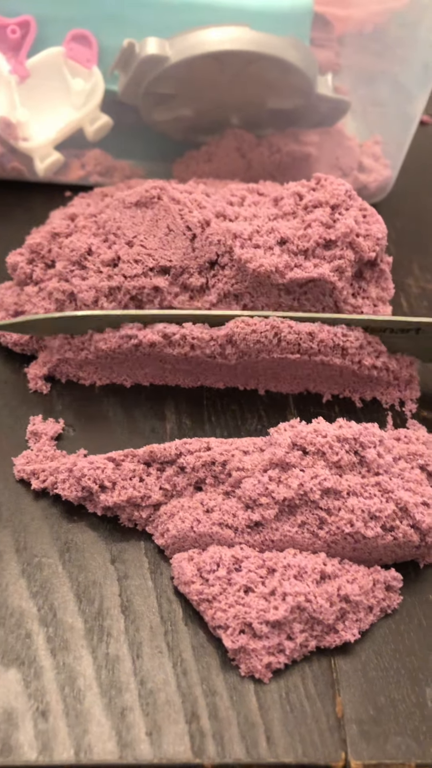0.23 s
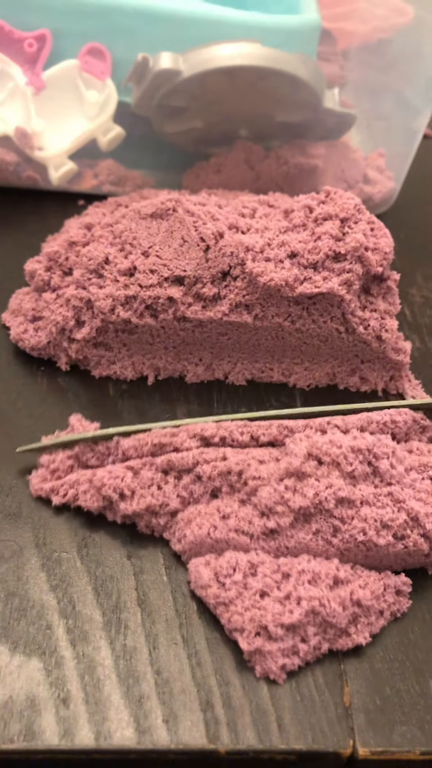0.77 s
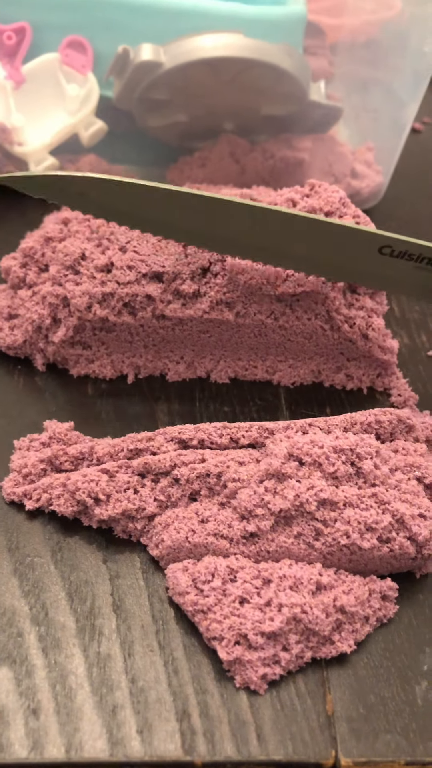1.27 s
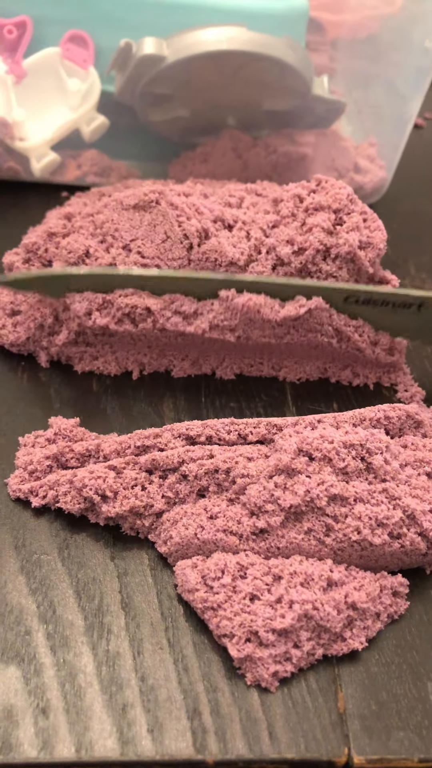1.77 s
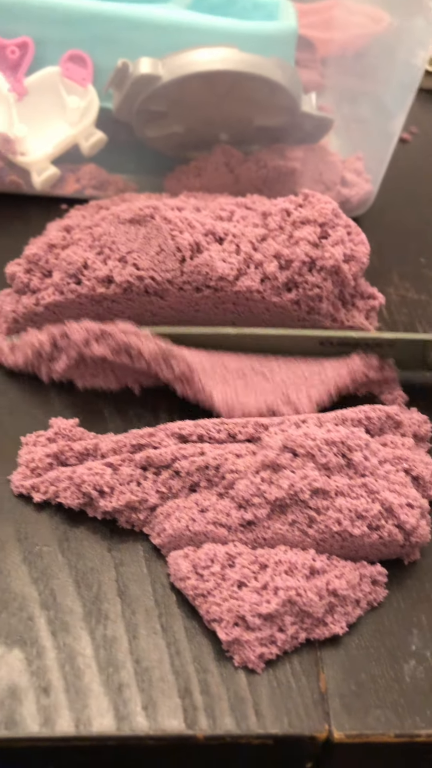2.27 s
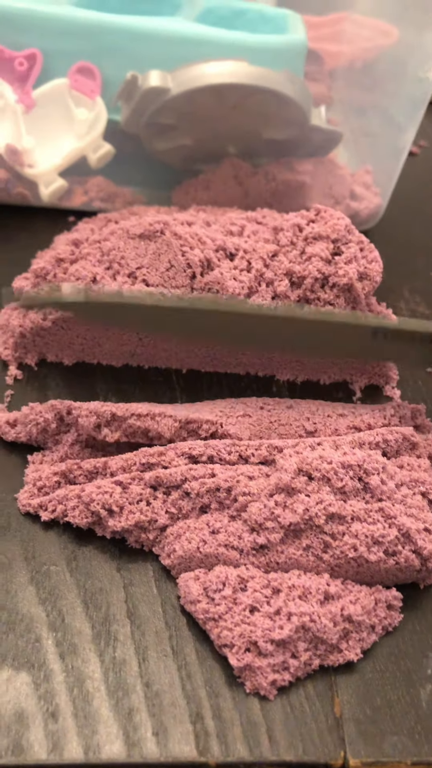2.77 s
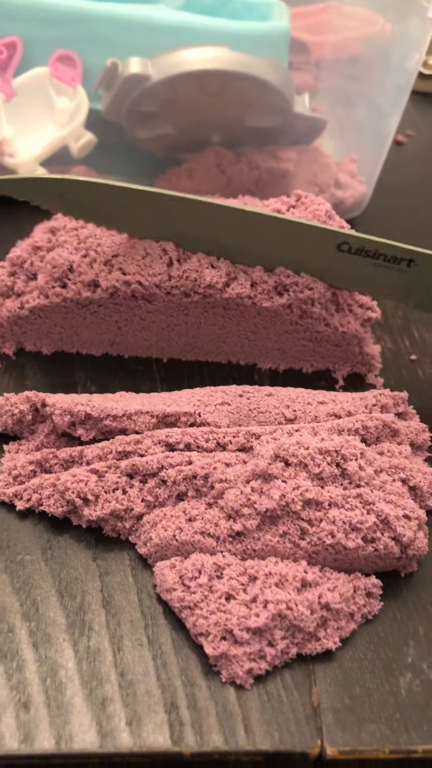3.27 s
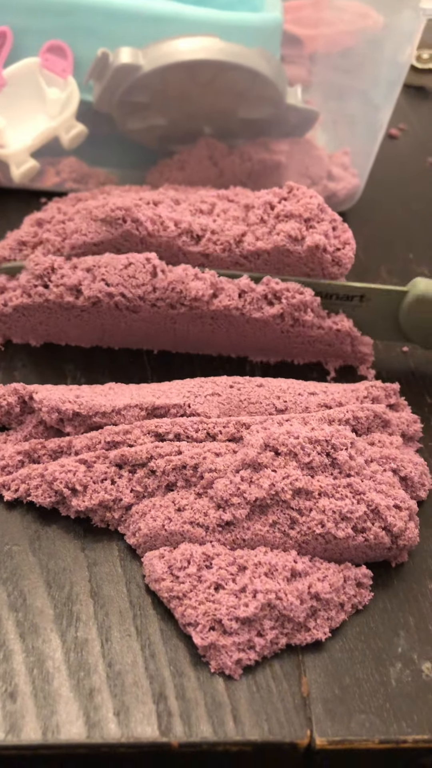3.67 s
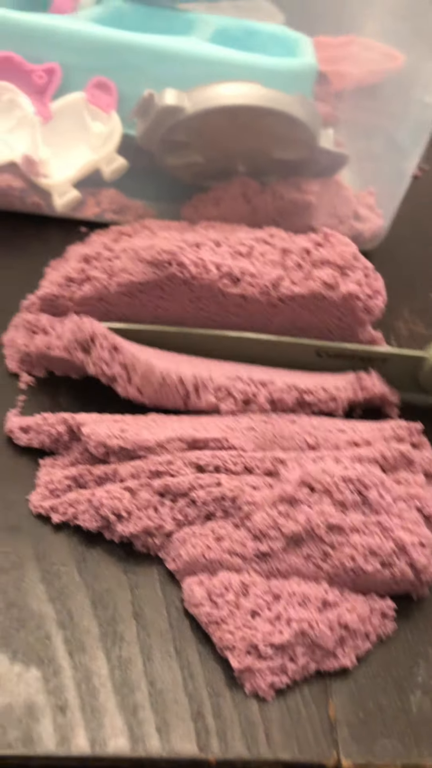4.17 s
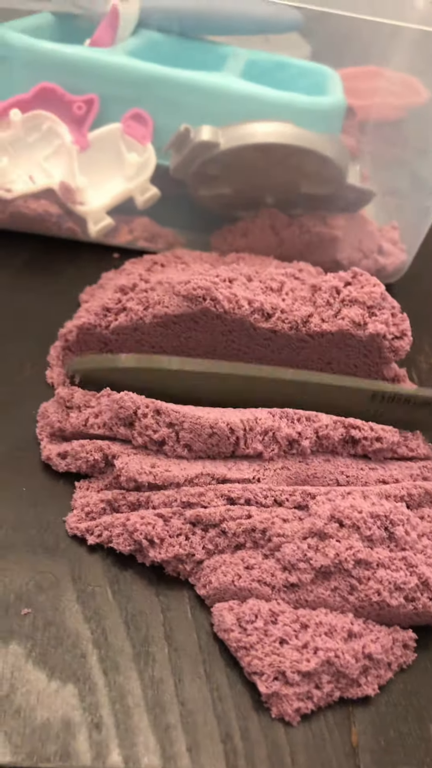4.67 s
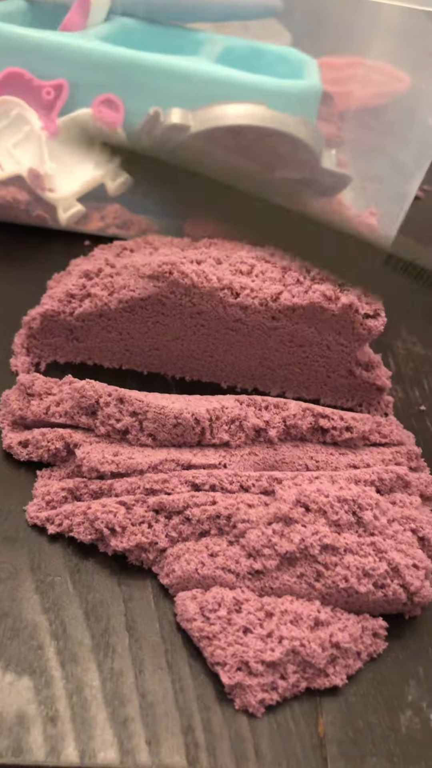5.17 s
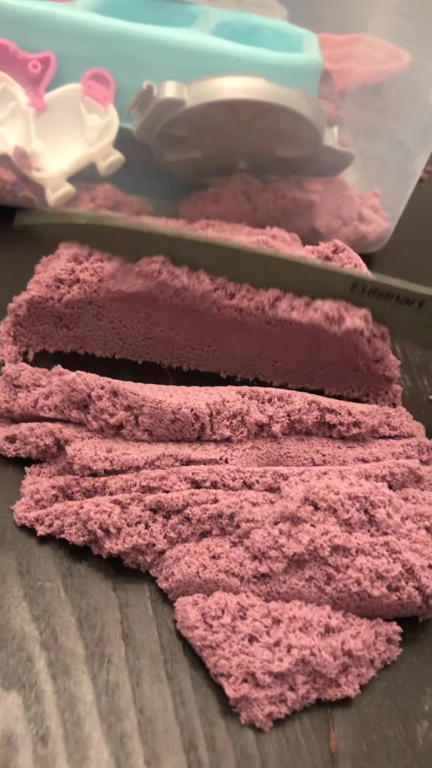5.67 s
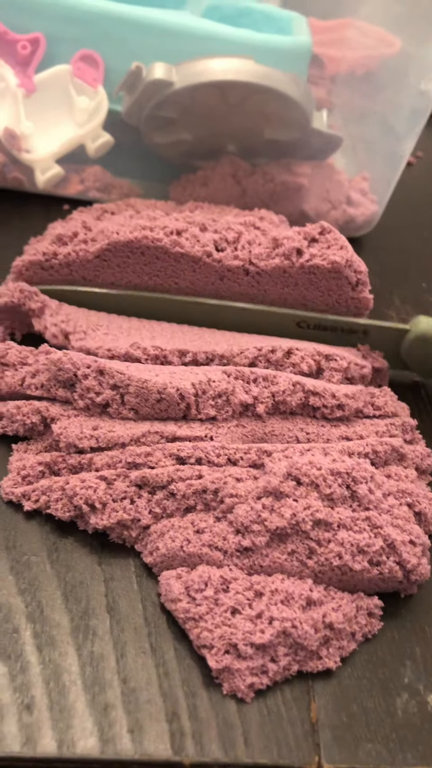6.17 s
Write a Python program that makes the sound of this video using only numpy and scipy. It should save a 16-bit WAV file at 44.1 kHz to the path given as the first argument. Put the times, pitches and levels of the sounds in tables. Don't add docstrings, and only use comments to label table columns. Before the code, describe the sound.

A knife hisses through damp gritty sand and clicks on a wooden board in four cuts, while a hollow box bumps far off.

```python
import sys
import numpy as np
from scipy import signal
from scipy.fft import rfft, irfft, next_fast_len
from scipy.io import wavfile
from scipy.ndimage import uniform_filter1d

SR = 44100
rng = np.random.default_rng(int(sys.argv[2]) if len(sys.argv) > 2 else 0)


def boost_factor(decibels):
    exponent = np.asarray(decibels, float) / 20
    return 10 ** exponent


def store_wav(level_fs):
    pcm = np.round(np.clip(np.atleast_2d(level_fs), -1, 1) * 32767)
    wavfile.write(sys.argv[1], SR, pcm.T.astype(np.int16))


N = 283122


def rms_one(x):
    return x / np.sqrt(np.mean(x ** 2) + 1e-20)


def at_hz(points, hz):
    points = np.array(points)
    return np.interp(np.log(hz + 1e-3), np.log(points[:, 0]), points[:, 1])


def smooth_noise(samples):
    noise = uniform_filter1d(rng.standard_normal(N), samples)
    return rms_one(uniform_filter1d(noise, samples))


def stroke_gain(strokes, column):
    t, gain = np.arange(N) / SR, np.zeros(N)
    for rows in map(np.array, strokes):
        gain += boost_factor(np.interp(t, rows[:, 0], rows[:, column], left=-200, right=-200))
    return uniform_filter1d(gain, size=101)


def coloured(x, spectrum):
    size = next_fast_len(len(x))
    gain = boost_factor(at_hz(spectrum, np.fft.rfftfreq(size, 1 / SR)))
    return rms_one(irfft(rfft(x, size) * gain, size)[:len(x)])


def resonate(x, hz, width_hz):
    r = np.exp(-np.pi * width_hz / SR)
    top = np.array([1, 0, -1]) * (1 - r * r) / 2
    return signal.lfilter(top, [1, -2 * r * np.cos(2 * np.pi * hz / SR), r * r], x + 1e-18)


def lag_pole(x, seconds):
    return signal.lfilter([1], [1, -np.exp(-1 / (seconds * SR))], x + 1e-30)


def grains(per_s, spread_db, clump_db, clump_s):
    clumps = np.clip(smooth_noise(int(clump_s * SR)), -1.5, 1.5)
    size_db = spread_db * np.minimum(rng.exponential(1, N), 4) + clump_db * clumps
    return boost_factor(size_db) * rng.choice([-1, 1], N) * (rng.random(N) < per_s / SR)


def table_echo(x, share, lag_s=0.000692):
    lag = round(lag_s * SR)
    return signal.lfilter(np.r_[1, np.zeros(lag - 1), share], [1], x)


# (frequency [Hz], level per Hz [dB])
HUM_SPECTRUM = [(15, -44), (25, -15), (92, -4.5), (123, -1), (161, -3), (180, -5), (242, -3), (354, -11),
                (394, -12), (607, -17.5), (677, -22.5), (887, -17), (1100, -22), (11900, -46.5),
                (16000, -42)]


def house_hum():
    return boost_factor(-57) * coloured(rng.standard_normal(N), HUM_SPECTRUM)


# (frequency [Hz], decay time t60 [s], build-up [s], trim [dB])
ROOM_DECAY = [(92, 0.32, 0.027, -12.5), (156.5, 0.45, 0.022, -5.5), (265, 0.51, 0.033, -11),
              (562, 0.57, 0.028, -8.5), (1480, 0.7, 0.005, -10), (3000, 0.7, 0.0011, -10),
              (7000, 0.63, 0.0024, -10), (13000, 0.44, 0.0026, -14.5)]


def room_bands(spectrum, peaks, size):
    hz = np.fft.rfftfreq(size, 1 / SR)
    lift = 1 + sum((boost_factor(db) - 1) / (1 + (2 * (hz - top_hz) / width) ** 2) for top_hz, width, db in peaks)
    noise = rfft(rng.standard_normal(size)) * boost_factor(at_hz(spectrum, hz)) * lift
    centres = np.array(ROOM_DECAY)[:, 0]
    return [rms_one(irfft(noise * at_hz(np.c_[centres, one], hz), size)) for one in np.eye(len(centres))]


# (time [s], force [dB], hardness as clatter over force [dB], slip as rustle over clatter [dB])
BOX_KNOCKS = [(-.004, -36.5, -10, -7), (0.163, -32, -12, -10), (0.265, -37.5, -14.5, -3.5),
              (2.219, -24, -5.5, -13.5), (2.262, -30, -19, 1.5), (2.355, -14, -13.5, -6.5),
              (2.432, -46.5, 12.5, -34), (2.95, -30, -9.5, -17), (3.31, -23.5, -15, -13.5),
              (3.462, -25, -15, -12), (3.502, -29.5, -32, -4), (3.534, -36, -5.5, -33),
              (3.65, -32.5, -14, -12), (3.741, -57, 14, -20), (3.965, -58.5, 5.5, -16),
              (4.321, -35, -10.5, -39), (4.691, -36.5, -5.5, -12.5), (4.732, -31.5, -19.5, 10),
              (4.912, -36, -11.5, -5), (5.269, -37, -14, -3), (5.316, -24.5, -9.5, -22)]
# (time [s], force [dB], hardness [dB], slip [dB])
BOX_SHOVES = [
    (0.099, -39, -12.5, -4),
    (.303, -44.5, -8, -13),
    (2.694, -33.5, -10.5, -11),
    (2.827, -43.5, -27.5, 8),
    (3.405, -40, -5.5, -7.5),
    (4.375, -40, 0, -11),
    (5.199, -32.5, -4, -7.5),
    (5.23, -29, -2.5, -11),
    (5.246, -16.5, -6, -13.5),
]


def box_contacts():
    knock_s, shove_s = 0.013, 0.047
    drag = [(4.814 + 0.081 * k, -35.5 + 4.5 * np.sin(np.pi * k / 4), -10.5, -11.5) for k in range(5)]
    rows = [(*row, knock_s) for row in BOX_KNOCKS] + [(*row, shove_s) for row in BOX_SHOVES + drag]
    contacts = []
    for s, force, hard, slip, length in rows:
        floor_db = -38 + 0.41 * force
        clatter_db = force + hard
        contacts.append((s, force, floor_db, clatter_db, clatter_db + slip, length))
    return contacts


# (frequency [Hz], level per Hz [dB])
FAR_SPECTRUM = [(24, -63), (40, -17), (77, 9), (115, -9.5), (269, -2), (320, -3.5), (503, -10.5),
                (556, -18.5), (1270, -20), (1440, -20.5), (2500, -29.5), (3220, -36), (16000, -71.5)]
# (frequency [Hz], width [Hz], level over the rest [dB])
BOX_PEAKS = [(196, 3.9, 0.5), (259.6, 31, 6), (381, 15, -3), (479.6, 11, -9), (896, 42, 3.5), (1278, 70, 4),
             (1600, 20, 0), (2406, 120, 4), (4060, 18, 6.5)]
CONTACT_HZ = [280, 90, 1300, 8000]


def far_box():
    t, bumps = np.arange(SR // 4) / SR, box_contacts()
    order, out = np.argsort(CONTACT_HZ), np.zeros(N)
    rattle = smooth_noise(400)
    bands = room_bands(FAR_SPECTRUM, BOX_PEAKS, next_fast_len(N))
    for noise, (hz, t60, build, trim_db) in zip(bands, ROOM_DECAY):
        power = np.zeros(N + len(t))
        for s, *levels_db, length in bumps:
            pour = np.exp(-2 * t / np.clip(length, .002, .1))
            level_db = at_hz(np.c_[np.sort(CONTACT_HZ), np.array(levels_db)[order]], hz) + trim_db
            start = round(max(s + .005, 0) * SR)
            power[start:][:len(t)] += boost_factor(2 * level_db) * (0.64 * pour / pour.sum() + 0.41 * (t == 0))
        stored = lag_pole(power, t60 / (2 * np.log(1000)))
        heard = np.maximum(stored - 0.52 * lag_pole(power, build), 0)[:N]
        lump = np.clip(rattle + 0.54 * np.roll(rattle, round(hz)), -3, 3)
        lump_gain = boost_factor(0.68 * lump * min(1, 2500 / hz, hz / 600) ** .5 - 1)
        out += lump_gain * noise[:N] * np.sqrt(heard)
    return out


# (frequency [Hz], level [dB], t60 [s], swell [s], driving column of box_contacts)
HOLLOW_MODES = [(270, -1, 0.2, 0.025, 1), (230.8, -7, .15, 0.0092, 1), (199.6, -10.5, 0.15, 0.025, 1),
                (87, 3, 0.32, 0.05, 2), (1270, -18, 0.27, 0.025, 3), (1580, -31, 0.41, 0.025, 3),
                (3930, -32, 0.41, 0.033, 3)]
# (time [s], frequency [Hz], level [dB], t60 [s])
BOARD_PINGS = [(2.26, 87, -39, 0.32), (3.316, 139, -33, 0.3), (3.335, 87, -40, 0.44), (3.54, 87, -43, 0.3),
               (4.34, 87, -36.5, 0.36), (4.95, 87, -49, 0.35), (5.05, 490, -38.5, 0.63),
               (5.235, 190, -21.5, 0.37), (5.235, 150, -19, 0.35), (5.24, 95, -31, .3),
               (5.29, 205, -26, .45), (5.25, 52, -45, 0.51), (3.312, 270, -32, 0.41),
               (3.49, 270, -29.5, .35), (3.65, 270, -32.5, 0.27), (.168, 270, -29.5, 0.18),
               (2.695, 270, -38, 0.27), (3.305, 590, -40.5, 0.39), (3.305, 440, -43, .35),
               (2.96, 590, -44, 0.46), (2.355, 255, -25.5, .3)]
# (time [s], frequency [Hz], level [dB], t60 [s])
FITTING_RINGS = [
    (2.415, 1295, -40, .45),
    (2.445, 2420, -48, .45),
    (2.46, 2500, -51, 1.0),
    (2.6, 1290, -54, .55),
    (2.226, 1900, -52, .3),
    (3.312, 1550, -50, .2),
    (2.36, 3950, -55, .45),
    (5.195, 2450, -50, .35),
    (5.38, 2550, -53, .7),
    (5.77, 14600, -70, .3),
]


def hollow():
    span = 28000
    t, out = np.arange(span) / SR, np.zeros(N + SR)
    drift = rms_one(uniform_filter1d(rng.standard_normal(N + SR), size=1500))
    waver = np.cumsum(1 + 0.0197 * drift) / SR
    strikes = [(*ping, .03) for ping in BOARD_PINGS + FITTING_RINGS]
    for row in box_contacts():
        for hz, db, t60, swell, column in HOLLOW_MODES:
            if row[column] + db > -78:
                strikes.append((row[0], hz, row[column] + db, t60, swell))
    for s, hz, db, t60, swell in strikes:
        i = round(max(s, 0) * SR)
        clock = waver[i:i + span]
        if hz >= 300:
            clock = t + .4 * (clock - clock[0] * 0 - waver[i:i + span] * 0 - t)
        out[i:i + span] += (1 - np.exp(-t / swell)) * boost_factor(db - 60 * t / t60) * np.sin(2 * np.pi * hz * clock)
    return out[:N]


def near_echo(knock, rub):
    t = np.arange(SR) / SR
    bands = room_bands([(200, -46), (2000, -7), (16000, 5)], [(830, 150, 0.5)], SR)
    tail = np.zeros(SR)
    for k, (noise, row) in enumerate(zip(bands, ROOM_DECAY)):
        tail += noise * boost_factor(-0.7 * k - 75 * t / row[1])
    response = np.r_[np.zeros(round(.009 * SR)), tail]
    return signal.fftconvolve(boost_factor(-53.5) * knock + boost_factor(-47.0) * rub, response)[:N]


# (time [s], peak level [dB], frequency [Hz])
GRAIN_TICKS = [(.6593, -62, 12000), (.748, -70, 9000), (.891, -74, 13000), (1.997, -57, 4250),
               (2.03, -75, 9000), (2.123, -67, 5970), (3.8285, -59, 5496), (3.911, -68, 3500),
               (3.939, -65, 3500), (4.002, -78, 3000), (4.134, -61, 3440), (4.224, -56, 3500),
               (4.29, -60, 7000), (4.317, -57, 4000), (6.1795, -61, 5960), (6.185, -50.5, 4400),
               (6.194, -52, 6000), (6.213, -63, 7500), (6.289, -61, 7400), (6.372, -63, 4400),
               (6.39, -64, 5900)]


def ticks():
    t, out = np.arange(SR // 100) / SR, np.zeros(N + SR // 100)
    for s, db, hz in GRAIN_TICKS:
        snap = np.diff(rng.standard_normal(len(t)) * np.exp(-t / 0.0025), prepend=0)
        out[round(s * SR):][:len(t)] += boost_factor(db) * table_echo(.3 * snap + 2 * resonate(snap, hz, 2500), share=.5)
    return out[:N]


# (time [s], knock level [dB], tick level [dB], top of the knock [Hz], path in wood [0-2])
EDGE_TAPS = [
    (0.6718, -56, -39, 1566, 0.43),
    (0.711, -41, -37.5, 1538, 0.36),
    (2, -33, -38, 935, 0.63),
    (3.8328, -29.5, -34, 878, 0.75),
    (4.1843, -48, -46, 1313, 0.59),
    (5.8585, -25, -29.5, 1356, 0.49),
]
# (frequency [Hz], level [dB], t60 [s])
TABLE_MODES = [(361, -4.5, 0.04), (545, -2, 0.034), (804, -2.5, 0.055), (1005, -2, 0.018),
               (1204, -5.5, 0.052), (1417, -1.5, 0.033), (1830, 0.5, 0.023), (3030, -2, 0.0091),
               (4400, 0, 0.012)]


def taps():
    t, out = np.arange(SR // 10) / SR, np.zeros(N + SR // 10)
    for s, knock_db, tick_db, top_hz, path in EDGE_TAPS:
        rough = rng.standard_normal(len(t))
        contact = -t / 0.00006 * np.exp(1 - t / 0.000075) + 0.14 * rough * np.exp(-t / 0.00087)
        hit = table_echo(boost_factor(tick_db) * contact, share=0.89)
        late = np.maximum(t - .0012, 0)
        sweep = np.sin(2 * np.pi * 1.25 * top_hz * late / (1 + late / (path * 0.029)))
        hit -= boost_factor(knock_db - 2.0) * (1 - np.exp(-late / 0.0014)) * np.exp(-(late / 0.0093) ** 3) * sweep
        for hz, db, t60 in TABLE_MODES:
            since = np.maximum(t - path * 0.066 / np.sqrt(hz), 0)
            swell = (1 - np.exp(-since * hz / 0.81)) ** 2 * boost_factor(-60 * (since / t60) ** 1.23)
            drive = 0.19 + 1.32 / (1 + (hz / top_hz) ** 4)
            level = boost_factor(knock_db + db - 8.0 + rng.standard_normal()) * drive
            hit += level * swell * np.sin(2 * np.pi * hz * since)
        out[round(s * SR):][:len(t)] += hit
    return out[:N]


# (time [s], scrape level [dB])
SCRAPE_STROKES = [
    [(.59, -75), (.65, -61), (.715, -60.5), (.76, -61), (.81, -92)],
    [(4.183, -49), (4.205, -56), (4.23, -62), (4.29, -52.5), (4.33, -58), (4.38, -69)],
    [(6.179, -53.5), (6.205, -59), (6.245, -58), (6.285, -57.5), (6.33, -60.5), (6.385, -51.5),
     (6.421, -56)],
]
# (frequency [Hz], level per Hz [dB])
SCRAPE_SPECTRUM = [(240, -40), (400, 0.5), (777, 10), (879, -5), (1140, -10.5), (2120, -18), (4380, -18.5),
                   (6440, -29), (16000, -37)]
# (frequency [Hz], width [Hz], level [dB])
BLADE_MODES = [(1400, 240, -6), (1840, 75, -13), (4300, 500, -29), (5740, 470, -25.5), (14000, 700, -20)]


def scrape():
    rubs = grains(7000, spread_db=2.5, clump_db=2.6, clump_s=.005)
    rings = sum(boost_factor(db) * rms_one(resonate(rubs, hz, width)) for hz, width, db in BLADE_MODES)
    rubbed = table_echo(coloured(rubs, SCRAPE_SPECTRUM), share=0.61)
    return stroke_gain(SCRAPE_STROKES, 1) * rms_one(rubbed + boost_factor(-5.5) * rings)


# (time [s], speed as grit level [dB])
CUT_STROKES = [
    [(.47, -82), (.55, -70), (.68, -70.5), (.77, -88)],
    [(1.57, -90), (1.68, -69), (1.8, -68), (1.92, -64.5), (1.999, -67)],
    [(3.43, -76), (3.49, -60.5), (3.75, -73.5), (3.832, -71)],
    [(5.56, -79), (5.71, -60.5), (5.78, -57), (5.858, -68)],
]
# (clods over grit [dB], finest hiss over its law [dB], packed sand crushed at the end [dB])
CUT_TEXTURES = [
    (6.5, -3, -11),
    (-1.5, 0.5, 8.5),
    (1.5, -3, 10),
    (-7, 4.5, 15.5),
]


def cut_levels():
    bite_s = 0.091
    tables = []
    for rows, (clods_db, fine_db, bite_db) in zip(CUT_STROKES, CUT_TEXTURES):
        s = np.linspace(rows[0][0], rows[-1][0], num=60)
        speed_db = np.interp(s, *np.transpose(rows))
        bite = np.clip(1 - (s[-1] - s) / bite_s, 0, 1)
        crunch_db = speed_db + clods_db + bite_db * bite
        finest_db = -24.5 + 0.7 * speed_db + fine_db
        tables.append(np.c_[s, speed_db, crunch_db, finest_db])
    return tables


# (frequency [Hz], level per Hz [dB])
GRIT_SPECTRUM = [(1500, 15.5), (2500, -44), (4400, 5), (6000, 2), (8500, -14), (11000, 3.5), (13000, 1),
                 (15000, -10), (16500, 6)]


def sand():
    rubs = grains(20000, spread_db=2, clump_db=.8, clump_s=.005)
    clods = grains(6000, spread_db=2.5, clump_db=1.2, clump_s=.01)
    grit = table_echo(coloured(rubs, GRIT_SPECTRUM), share=0.054)
    finest = coloured(rubs[::-1], [(6000, -16), (9500, -6.0), (13000, -15), (15200, -4.0), (16500, -3.5)])
    crunch = rms_one(signal.sosfilt(signal.butter(1, [500, 2600], "band", fs=SR, output="sos"), clods))
    cuts = cut_levels()
    return stroke_gain(cuts, 1) * grit + stroke_gain(cuts, 2) * crunch + stroke_gain(cuts, 3) * finest


def scene():
    background = house_hum() + far_box() + hollow()
    knock, rub = taps() + ticks(), sand() + scrape()
    return (background + near_echo(knock, rub) + knock + rub)[None]


def roll_off(x):
    return signal.sosfilt(signal.butter(12, 15700, fs=SR, output="sos"), x)


def record(dry):
    mix = signal.sosfilt(signal.butter(3, 42, "high", fs=SR, output="sos"), dry)
    return roll_off(mix)


dry = scene()
out = record(dry)
store_wav(out)
```